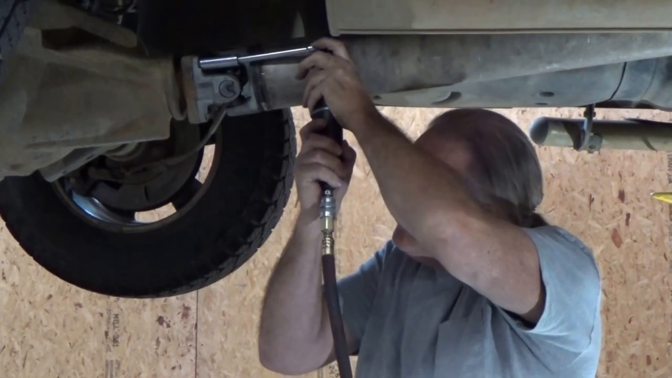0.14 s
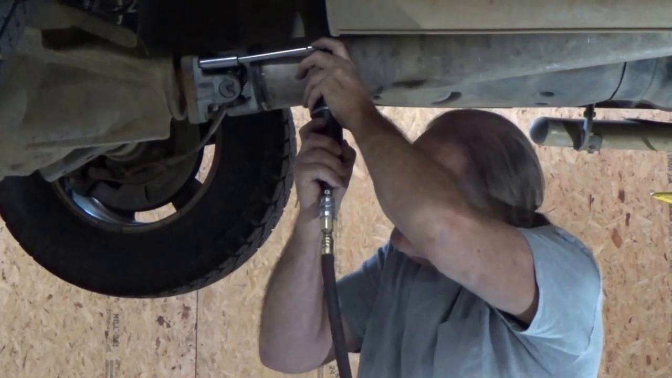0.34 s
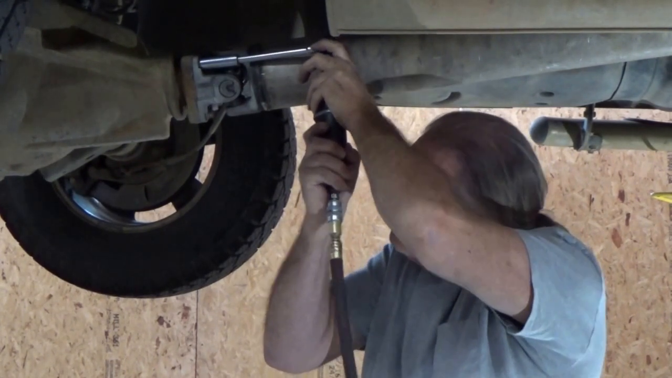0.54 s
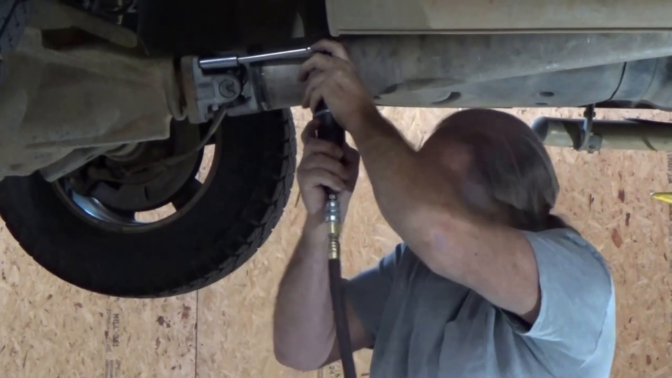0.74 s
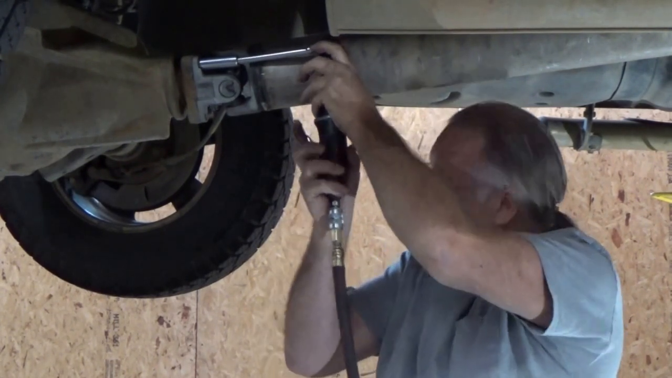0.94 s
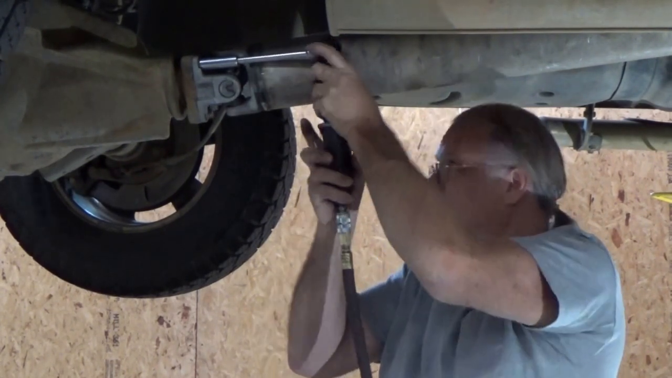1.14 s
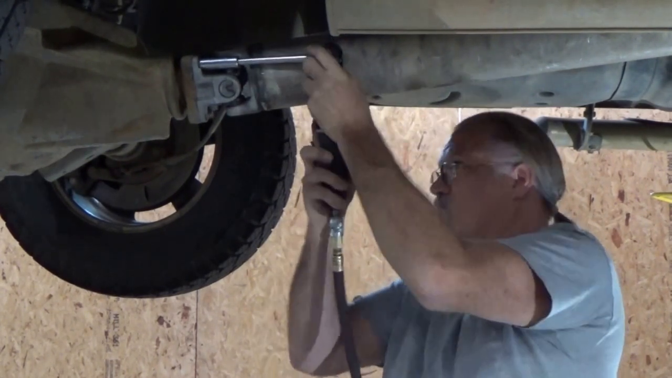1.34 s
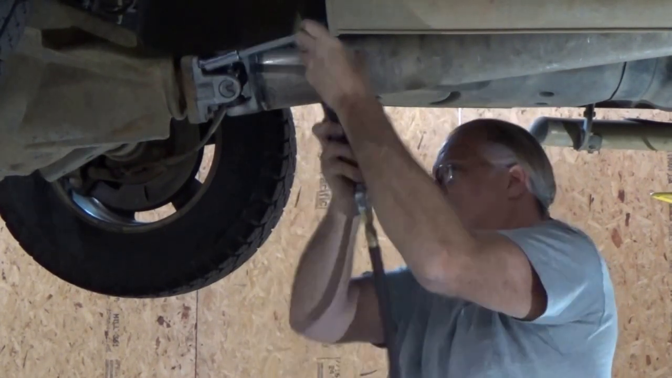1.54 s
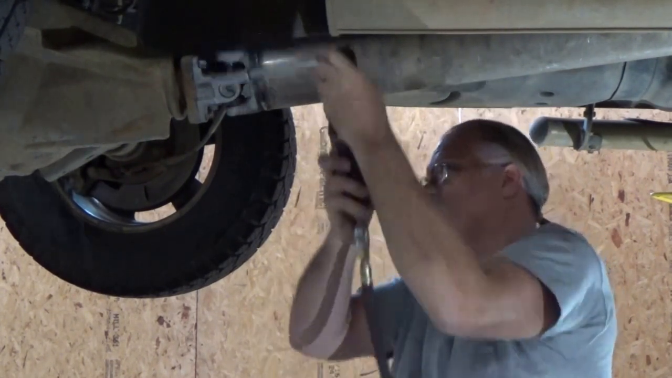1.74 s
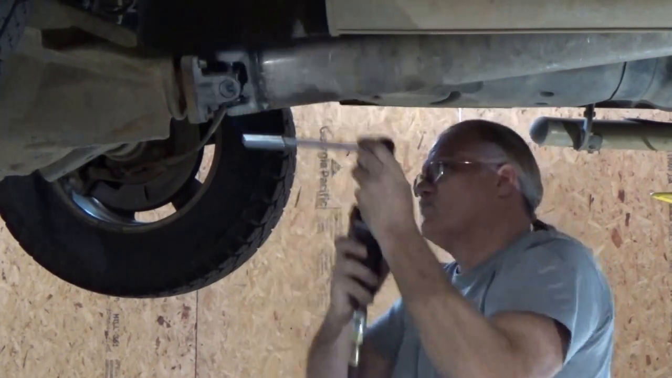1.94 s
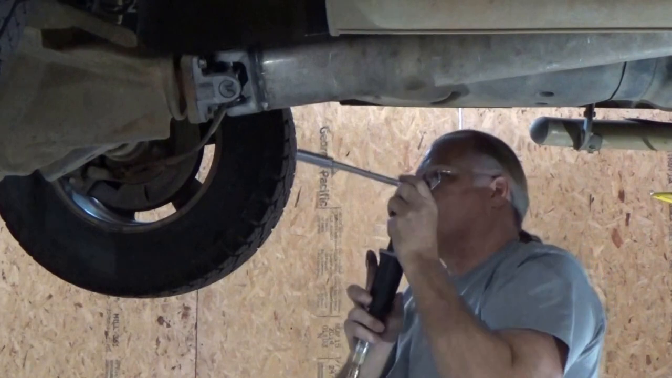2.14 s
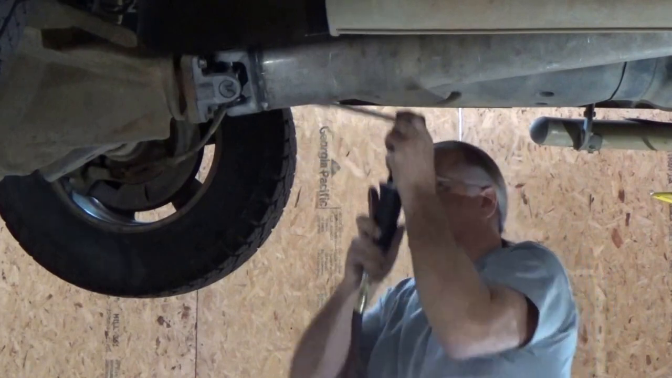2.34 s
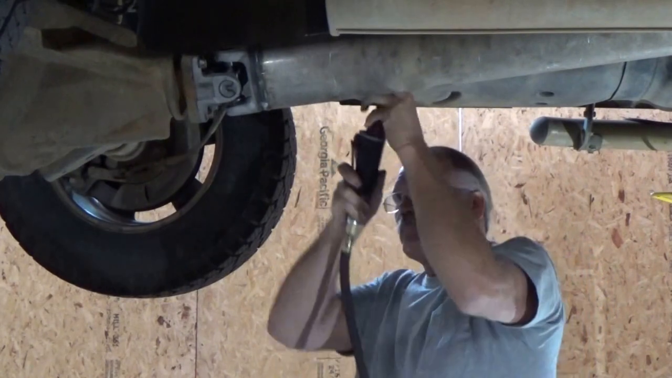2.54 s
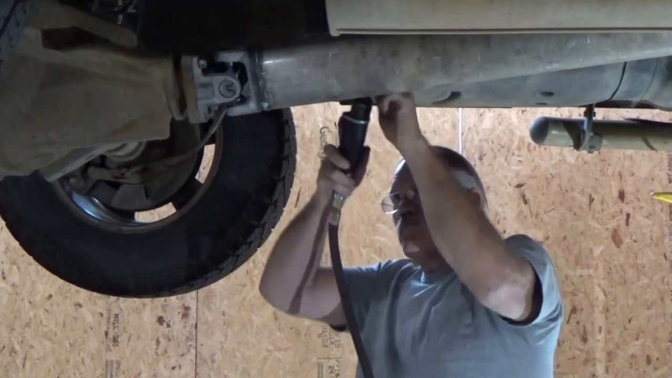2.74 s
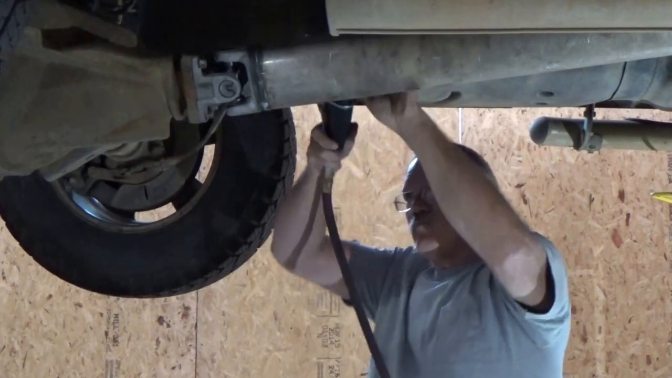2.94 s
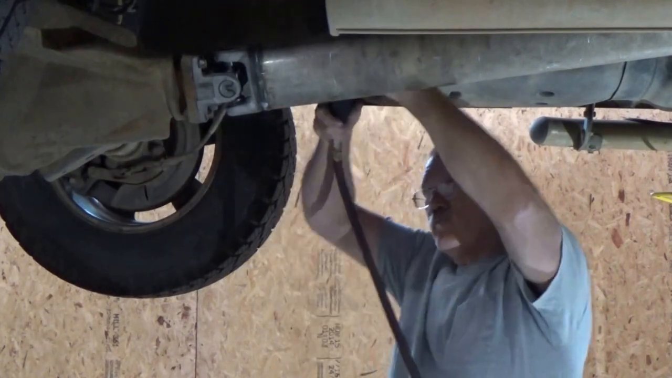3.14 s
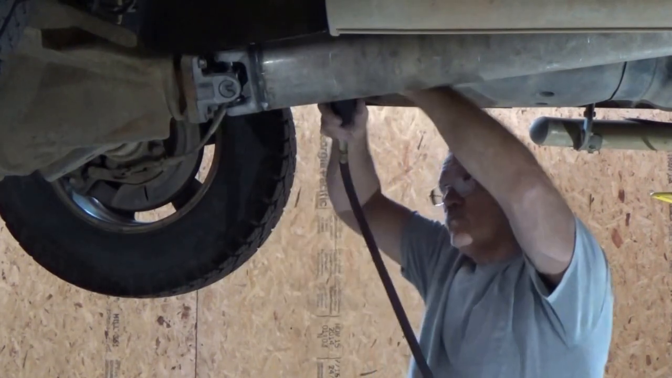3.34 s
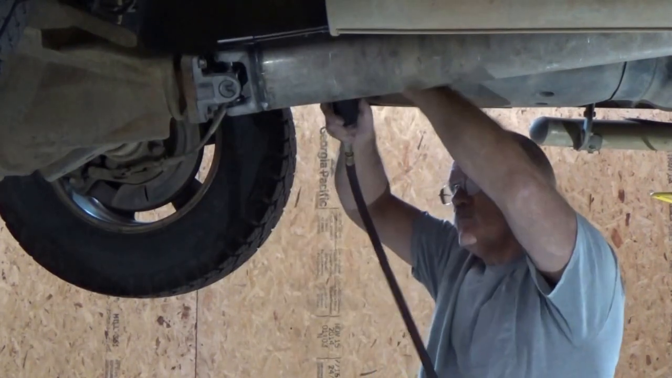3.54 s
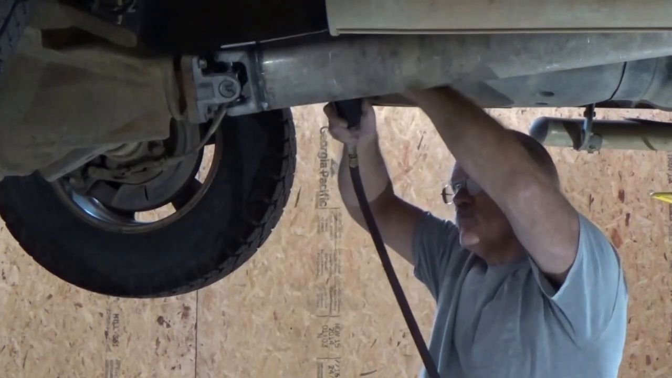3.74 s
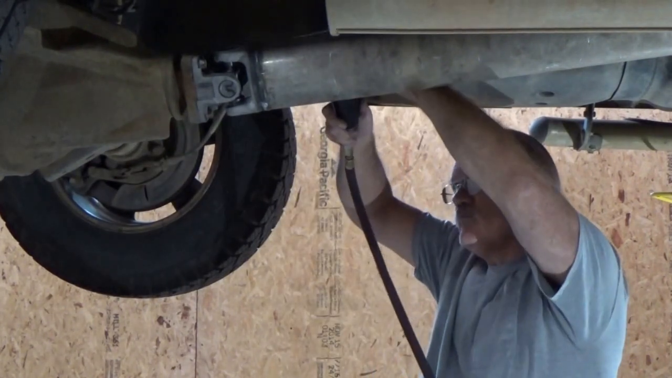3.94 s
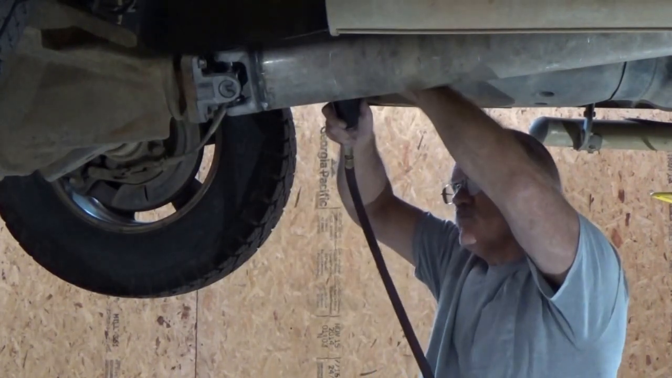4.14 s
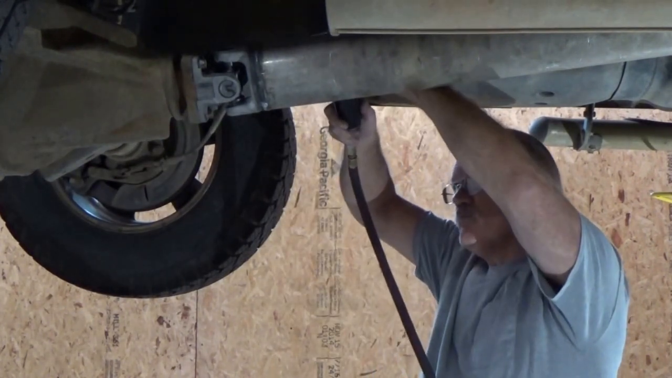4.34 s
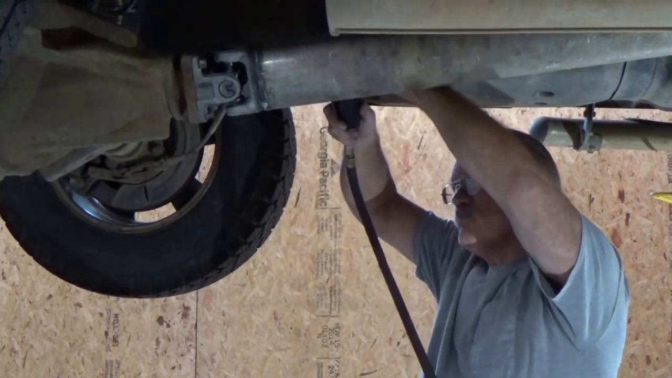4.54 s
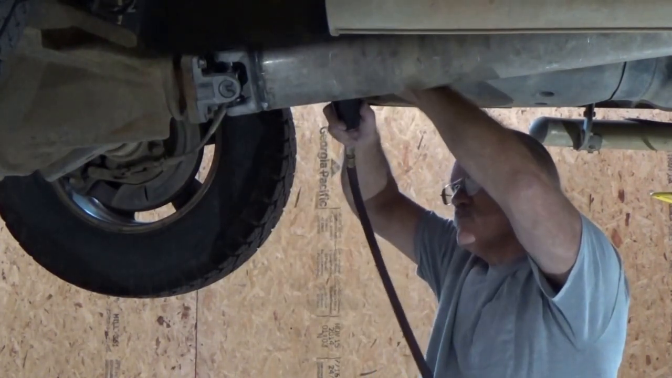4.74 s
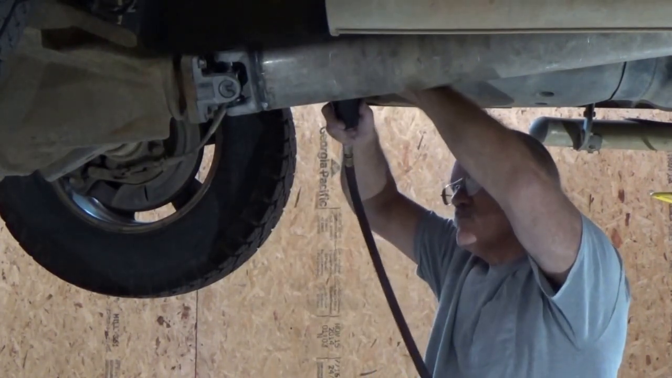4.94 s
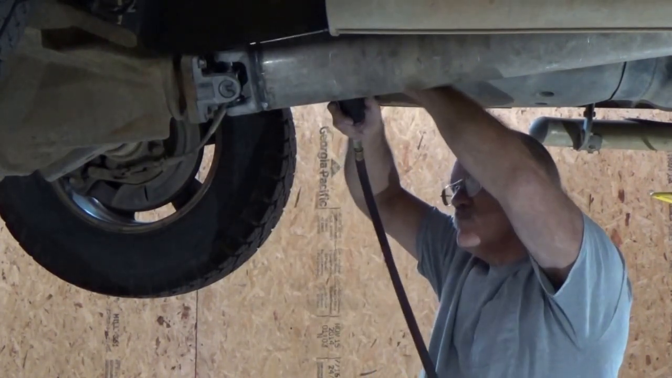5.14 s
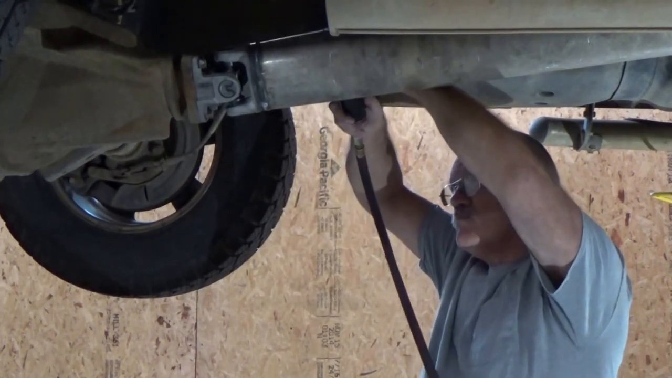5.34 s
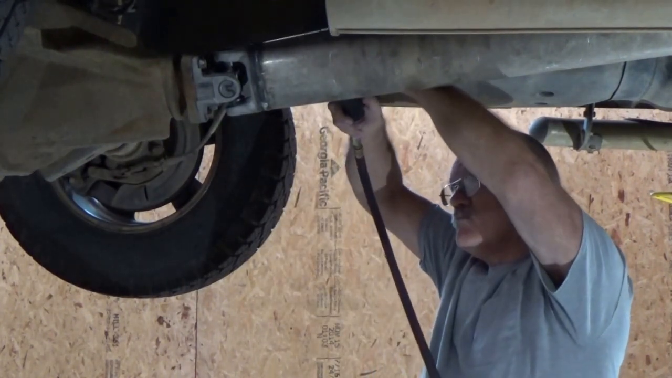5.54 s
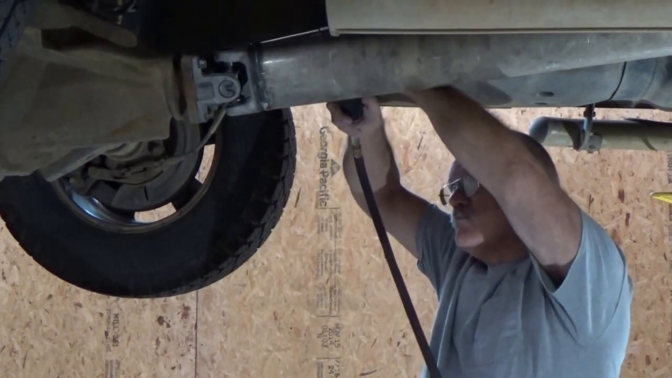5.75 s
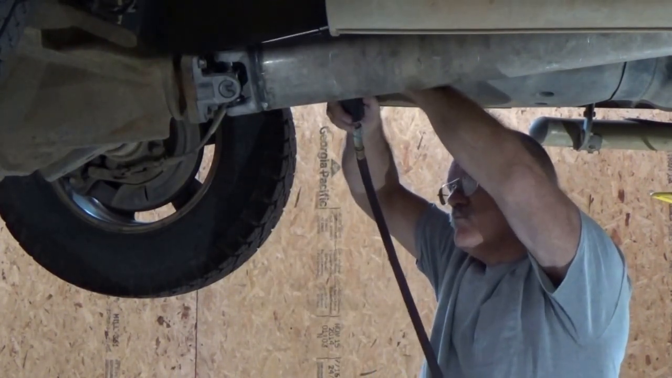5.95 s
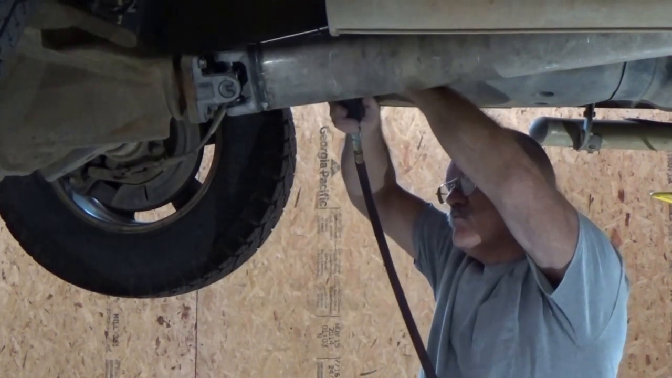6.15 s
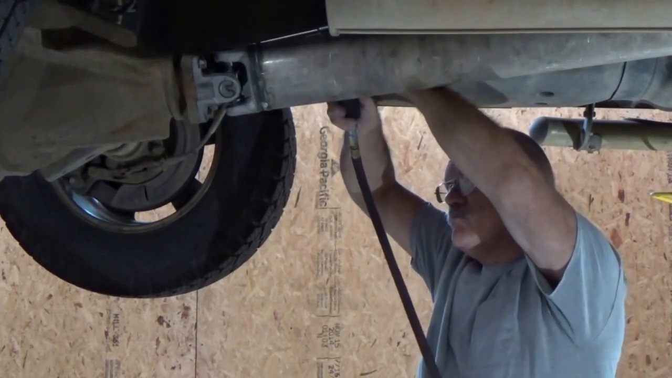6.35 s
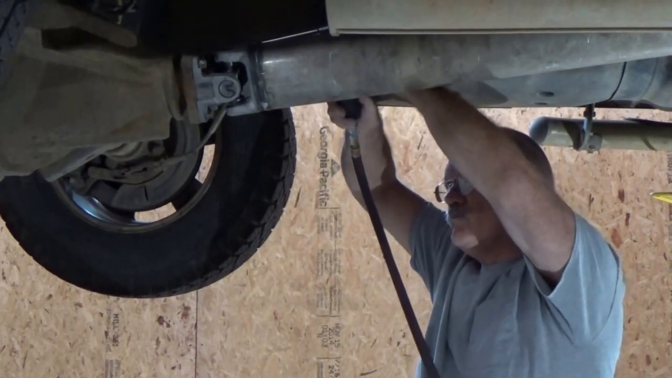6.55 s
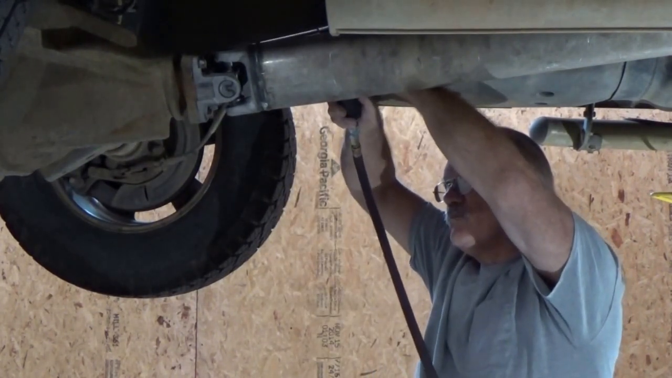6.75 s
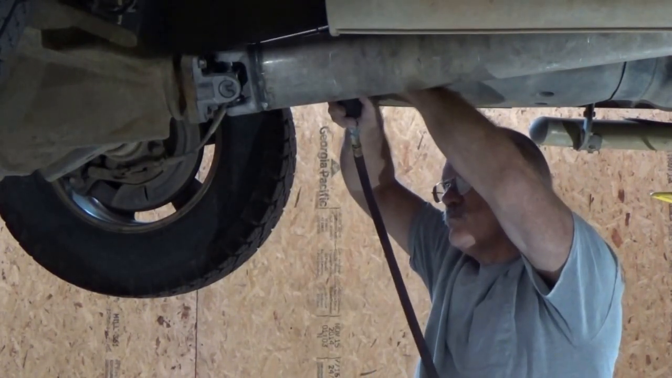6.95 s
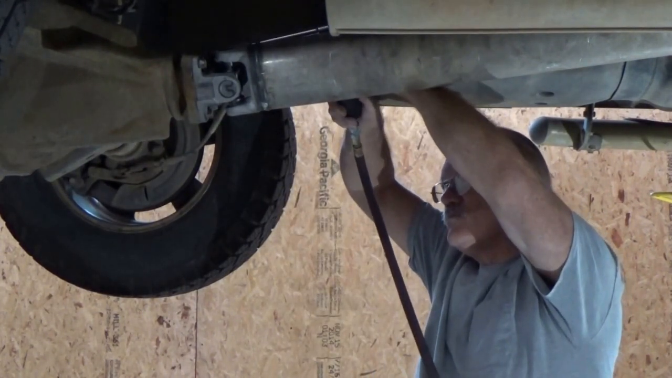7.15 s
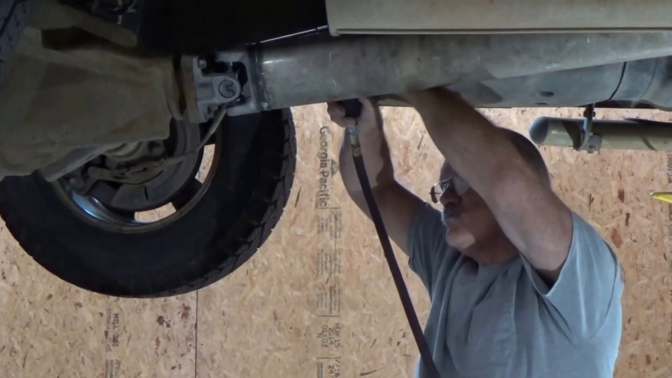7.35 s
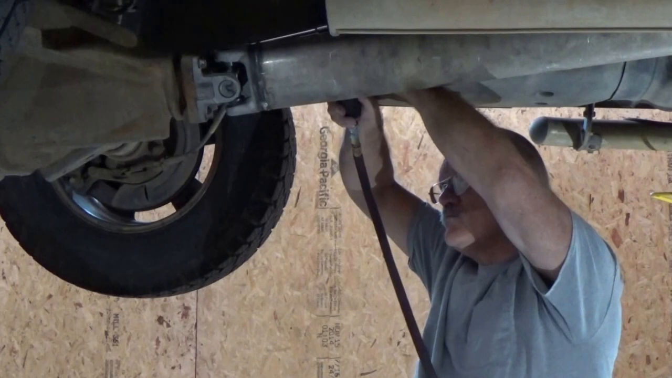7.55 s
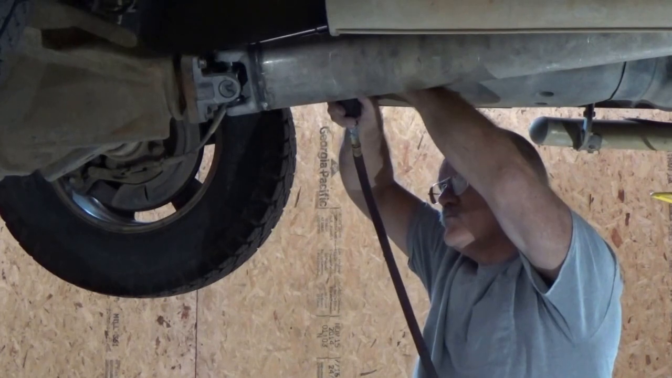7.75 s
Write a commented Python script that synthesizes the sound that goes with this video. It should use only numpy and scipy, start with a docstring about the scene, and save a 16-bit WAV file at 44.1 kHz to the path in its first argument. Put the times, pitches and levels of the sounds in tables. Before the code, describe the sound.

An air ratchet hisses and rattles to a stop, metal knocks under a truck, then the tool runs again with a loud hiss and whine.

```python
"""First the exhaust hiss of an air ratchet, close to a microphone pair under a truck in a wooden workshop.
Gears and pawl rattle as it labours on a bolt and stops. The socket comes off with a clink, and the
tool knocks about the ringing steel underbody while its coupling leaks faintly over a low rumble.
Then it runs at full speed: a loud rush of air from the muffler with the whine of its six-vane motor."""
import sys
import numpy as np
from scipy import signal
from scipy.fft import rfft, irfft, next_fast_len
from scipy.io import wavfile

SR = 44100
rng = np.random.default_rng(int(sys.argv[2]) if len(sys.argv) > 2 else 0)


def to_wav(s):
    """Save 16-bit WAV."""
    ch = np.atleast_2d(s).T  # columns
    pcm = np.round(np.clip(ch, -1, 1) * 32767)  # PCM
    wavfile.write(sys.argv[1], SR, pcm.astype(np.int16))


N = 344421
T = np.arange(N) / SR


# the air jet, heard close up: f/Hz, level/dB
JET_SPECTRUM = [(100, -52.5), (450, -27), (2000, -22), (3500, -13.5), (4500, -17.5), (5750, -10.5),
                (6650, -17), (8100, -5.5), (9300, -1.5), (10700, 0), (12400, -1.5), (14000, -7),
                (16000, -13.5)]
# narrow resonances of the muffler ports: f/Hz, width/Hz, level/dB
MUFFLER_PORTS = [(5820, 60, -1.5), (6700, 38, -7), (8000, 44, -7), (8720, 40, -2.5), (8700, 70, -13),
                 (9080, 80, -3), (9670, 39, -9.5), (10100, 60, -14), (11915, 58, -5), (12500, 110, -4),
                 (13600, 73, -2), (14600, 74, -4)]

def exhaust(flutter_db=.6):
    """Turbulent air leaves through the muffler ports and rings in them."""
    jet = colour(rng.standard_normal(N), JET_SPECTRUM)
    jet = jet + resonances(jet, MUFFLER_PORTS)
    return airflow() * from_db(flutter_db * drift(150)) * rms_one(jet)


# trigger pulls: pressed t/s, released t/s, air level/dB, gear level/dB, whine level/dB
TRIGGER_PULLS = [(-1, .825, -16.3, -39.5, -46), (5.37, 8, -17.6, -33, -29.6)]
VALVE_OPEN_S = .017

def airflow(shut_db_per_s=1200, bleed_db=-21, bleed_db_per_s=130):
    """Gain of the air: the valve opens, holds and shuts, then what is left in the motor bleeds away."""
    flow = 0
    for pressed, released, air_db, _, _ in TRIGGER_PULLS:
        opening = np.minimum(since(pressed) / VALVE_OPEN_S, 1)
        after = since(released)
        closing_db = np.maximum(-shut_db_per_s * after, bleed_db - bleed_db_per_s * after)
        flow = flow + opening * from_db(air_db + closing_db)
    return flow


# rotor whine, the sixth order being the vanes: multiple of the turning rate, level/dB
ROTOR_ORDERS = [(2, -24), (4, -18), (5, -12), (6, 1), (8, -19), (12, -19)]
# gear rattle: f/Hz, level/dB
GEAR_SPECTRUM = [(25, -40), (60, -25), (130, -7), (300, -10.5), (480, 0.5), (900, -0.5), (1400, 4),
                 (2100, -3.5), (3000, -2.5), (5000, 3.5), (8000, 1), (16000, -3)]
# snap of the pawl: f/Hz, level/dB
PAWL_SPECTRUM = [(25, -45), (60, -27), (150, -2), (300, -5.5), (550, -2), (780, 1), (1100, -9), (2000, -9),
                 (3600, -2), (6000, -12.5), (16000, -31)]

def motor(hunting=.001, wander=.0006, judder=2.5, waver_db=1.0, uneven_db=2.5):
    """The rotor whines, and growls under load; gears rattle and the pawl snaps once per stroke."""
    speed_hz, gear_gain, whine_gain, pawl_gain, growl_gain = rotor()
    # the speed hunts slowly, and a stiff bolt makes it judder
    unsteady = 1 + hunting * drift(6) + wander * drift(60) + judder * pawl_gain * drift(250)
    turns = np.cumsum(speed_hz * unsteady) / SR
    angle = 2 * np.pi * turns
    whine = sum(from_db(db + waver_db * drift(35)) * np.sin(k * angle) for k, db in ROTOR_ORDERS)
    growl = from_db(4 * drift(120)) * np.sin(2 * angle)
    # one stroke of the yoke in five turns, each an impact that dies away
    strokes = turns / 5
    force = from_db(uneven_db * rng.standard_normal(N))[strokes.astype(int)]
    gears = colour(rng.standard_normal(N) * np.exp(-1.3 * (strokes % 1)), GEAR_SPECTRUM)
    pawl = colour(rng.standard_normal(N) * force * np.exp(-3 * (strokes % 1)), PAWL_SPECTRUM)
    return whine_gain * whine + growl_gain * growl, gear_gain * gears + pawl_gain * pawl


# the bolt tightens: t/s, share of the speed lost
BOLT_LOAD = [(.3, 0), (.44, .05), (.53, .18), (.57, .31), (.82, .32), (1.0, .32), (1.2, 0)]

def rotor(free_hz=569, lag_s=.016, spin_up_s=.015, coast_s=.11, overshoot=.052, overshoot_s=.24):
    """Trigger and bolt set the speed; speed and load set the gains of gears, whine, pawl and growl."""
    load = in_time(BOLT_LOAD)
    speed_hz = gears = whine = pawl = growl = 0
    for pressed, released, _, gear_db, whine_db in TRIGGER_PULLS:
        spin = 1 - np.exp(-since(pressed + lag_s) / spin_up_s)
        coast = np.maximum(1 - (since(released) / coast_s) ** 2, 0)
        # pressure stored in the hose makes the speed overshoot at first
        pressure = 1 + overshoot * np.exp(-since(pressed) / overshoot_s)
        driven = np.minimum(since(pressed) / VALVE_OPEN_S, 1) ** 2 * coast ** 3
        surge = 4 * spin * (1 - spin)  # the work of speeding up peaks at half speed
        speed_hz = speed_hz + free_hz * spin * coast * pressure * (1 - load)
        gears = gears + driven * from_db(gear_db + 17 * load)
        whine = whine + driven * spin ** 8 * from_db(whine_db - 20 * load)
        pawl = pawl + driven * (from_db(-56 + 53 * load) + (1 - spin) * from_db(-27))
        growl = growl + driven * from_db(-58 + 14 * load) + surge * spin * from_db(-21)
    return speed_hz, gears, whine, pawl, growl


# the pawl snatches as the motor stops: t/s, level/dB, f/Hz
PAWL_SNATCHES = [(.839, -19.5, 780), (.872, -28, 613)]

def snatches(t60=.066):
    """A jolt through the drive rings briefly in the bolted part."""
    out = np.zeros(N)
    for s, db, hz in PAWL_SNATCHES:
        add(out, s, damped_tone(hz, db, t60))
    return out


# tool and socket against the steel: t/s, level/dB, softness 0-1, relative tick level/dB
BLOWS = [(1.4498, -41, .35, -18), (1.5852, -39, .03, -2.5), (1.642, -30, .08, -5), (1.7815, -36, 0, -3),
         (2.3314, -49.5, 0, 1.5), (2.359, -48.5, .05, 3), (2.397, -52, .2, 5), (2.5328, -30, .78, 0),
         (2.57, -42.5, .8, 0), (2.6958, -12.5, .15, -23), (2.8948, -11.2, .21, -8.5),
         (3.043, -33.5, .52, -12), (3.237, -43.5, .58, -16), (3.4505, -43.5, .93, -14),
         (3.5677, -24.5, .34, -12), (3.657, -27, .62, -14), (3.8105, -35, .5, -17), (3.986, -34, .38, -22),
         (4.0798, -24, .38, -11), (4.6505, -39.5, .86, -12), (4.7187, -45.5, .8, -14),
         (4.7338, -33, .33, -19), (4.7595, -35.5, .58, -18), (4.8724, -29.5, .54, -9),
         (5.0649, -31, .45, -5), (5.1367, -50.5, .86, -10)]
# thump, body, clack and tick of a blow: low f/Hz, high f/Hz, level/dB, t60/s
BLOW_BANDS = [(102, 230, -4.5, 0.25), (453, 2170, 6, 0.083), (1300, 5940, 1.5, 0.072),
              (6940, 13500, 8, 0.03)]
# resonances of the truck's underbody: f/Hz, width/Hz, level/dB
UNDERBODY_MODES = [(165, 14, 7), (292, 30, 12), (464, 57, 4), (524, 55, 7), (613.5, 16.4, 12), (720, 30, 7),
                   (1028, 18, 6), (1145, 40, 9), (1720, 60, 1), (2200, 50, -1), (2440, 45, 6),
                   (2960, 150, -12), (3500, 60, -5), (4040, 45, 3), (5300, 300, -3), (5940, 60, -1),
                   (10020, 1860, 7.5)]
BODY_DB, BODY_SOFT_DB = -27, 33  # body of a hard blow, and what full softness adds

def knocks(grain_db=2.5, gain_db=-6.5, hard_rise_s=.00065, soft_rise_s=.0043):
    """Each blow sets off a dense clatter of steel, the lows lasting longest, coloured by the underbody."""
    out = np.zeros(N)
    for s, db, softness, tick_db in BLOWS:
        white, grain = rng.standard_normal((2, SR))
        # soft blows have more thump and body, swell more slowly and last longer
        thump_db, body_db = -49 + 57 * softness, BODY_DB + BODY_SOFT_DB * softness
        cushion = softness ** 3
        clatter = rms_one(white * from_db(grain_db * grain)) * rise(hard_rise_s + soft_rise_s * cushion)
        for (low, high, band_db, t60), own_db in zip(BLOW_BANDS, (thump_db, body_db, 0, tick_db)):
            width_gain = np.sqrt(SR / 2 / (high - low))
            part = band(clatter * fade(t60 * (1 + .9 * cushion)), low, high)
            add(out, s, from_db(db + band_db + own_db) * width_gain * part)
    return from_db(gain_db) * (out + resonances(out, UNDERBODY_MODES))


# the socket touches its extension: t/s, level/dB
SOCKET_TOUCHES = [(1.2508, -24), (1.2575, -9)]
# modes of the socket: f/Hz, level/dB, t60/s
SOCKET_MODES = [(8550, -1, .02), (9450, 2, .018), (11900, -16, .012), (13300, -23, .012)]

def socket():
    """The hand-held socket rings in beating modes that are quickly damped, over a light tick."""
    out = np.zeros(N)
    clink = sum(damped_tone(*mode) for mode in SOCKET_MODES) * rise(.00073)
    tick = from_db(-21.5) * band(rng.standard_normal(SR), 1900, 12500) * fade(.039)
    for s, db in SOCKET_TOUCHES:
        add(out, s, from_db(db) * (clink + tick))
    return out


# steel brushes along steel: t/s, level/dB
BRUSH_TOUCHES = [(2.156, -44), (3.657, -35), (4.875, -43)]
# mode clusters of the steel around the microphones: f/Hz, half width/Hz, relative level/dB, t60/s
FRAME_RING = [(90, 7.2, -27, .85), (143, 6.3, -24.5, 2.0), (245, 25, -33, 1.3), (430, 18, -29, .7)]
FLOOR_PAN_RING = [(230, 90, -10, .28), (560, 70, -7, .24), (755, 23, -5, .2), (1025, 18, -6, .26),
                  (1140, 30, -10, .16), (1900, 400, -7, .13)]
SOCKET_AFTER_RING = [(8600, 200, -30, .13), (9700, 280, -28, .17)]
BRUSHED_RING = [(800, 400, -12, .4), (2430, 170, 0, .36), (3930, 1700, -7, .42)]
EXTENSION_RING = [(200, 70, -2, .3), (390.5, 4, 1, .62)]

def ringing_steel(bar_freed_s=1.644):
    """Frame, floor pan, socket, brushed steel and extension bar ring on after a jolt or touch."""
    out = np.zeros(N)
    for s, db, _ in PAWL_SNATCHES:
        add(out, s, from_db(db) * ring(FRAME_RING, rise_s=.045))
    for s, db, softness, _ in BLOWS:
        if softness > .55:  # only soft blows set the pan going
            body_db = db + BODY_DB + BODY_SOFT_DB * softness
            add(out, s, from_db(body_db) * ring(FLOOR_PAN_RING, rise_s=.006))
    for s, db in SOCKET_TOUCHES:
        add(out, s, from_db(db) * ring(SOCKET_AFTER_RING, rise_s=.001))
    for s, db in BRUSH_TOUCHES:
        add(out, s, from_db(db) * ring(BRUSHED_RING, rise_s=.009))
    add(out, bar_freed_s, from_db(-52) * ring(EXTENSION_RING, rise_s=.0022))
    return out


# thin hiss at the coupling: f/Hz, level/dB
LEAK_SPECTRUM = [(1500, -27), (5000, -13), (7000, -17), (9000, -8), (10800, -3.5), (13000, -8.5),
                 (16000, -12)]
# its rise and fall: t/s, level/dB
LEAK_CURVE = [(1.3, -66), (2.01, -67), (2.52, -64), (2.86, -57), (3.37, -64), (5.1, -56), (5.35, -57)]

def coupling_leak(gain_db=2.6, spurt_s=4.95, spurt_db=-51, spurt_half_s=.06):
    """Air escapes at the coupling and spurts once as the hose is bent."""
    seep = from_db(in_time(LEAK_CURVE) + gain_db)
    spurt = from_db(spurt_db) * np.exp(-((T - spurt_s) / spurt_half_s) ** 2)
    return (seep + spurt) * colour(rng.standard_normal(N), LEAK_SPECTRUM)


# low rumble behind the work: f/Hz, level/dB
RUMBLE_SPECTRUM = [(20, -26), (40, -11.5), (62, 6), (80, 1.5), (110, 3.5), (180, 1), (300, -5.5),
                   (600, -9.5), (1200, -11), (2500, -14), (6000, -26), (16000, -64.5)]
# its rise and fall: t/s, level/dB
RUMBLE_CURVE = [(0.0, -72), (1.07, -62), (1.36, -72), (3.45, -65), (3.82, -58), (4.2, -63), (5.21, -60),
                (5.32, -64), (6.1, -70)]
# the quiet workshop: f/Hz, level/dB
ROOM_TONE_SPECTRUM = [(30, -4), (180, 0), (300, 0), (700, -18), (1500, -13.5), (6700, -28), (10000, -21.5),
                      (16000, -15)]

def room_tone(rumble_gain_db=7.3, quiet_db=-80.5):
    """A low rumble swells and sinks over the steady quiet of the shop."""
    rumble_gain = from_db(in_time(RUMBLE_CURVE) + rumble_gain_db)
    rumble = rumble_gain * colour(rng.standard_normal(N), RUMBLE_SPECTRUM)
    return rumble + from_db(quiet_db) * colour(rng.standard_normal(N), ROOM_TONE_SPECTRUM)


# reverberation of the wooden room: f/Hz, t60/s
WORKSHOP_T60 = [(130, 1.04), (400, 0.76), (1000, 0.45), (3000, 0.74), (6000, 0.73), (10000, 0.31),
                (15000, 0.18)]
# difference between the two microphones: f/Hz, side level/dB
SIDE_SPECTRUM = [(60, -20), (250, -11.5), (1000, 2), (5000, -2), (9000, 1), (13000, -26.5)]

def workshop(x, wet_db, side_db, build_s=.005):
    """Diffuse reflections build up and die band by band, a little different at each microphone."""
    edges = np.geomspace(60, 17000, 13)
    tail = 0
    for low, high in zip(edges, edges[1:]):
        t60 = at_hz(WORKSHOP_T60, np.sqrt(low * high))
        tail = tail + band(rng.standard_normal((2, SR)), low, high) * fade(t60)
    response = rms_one(tail * rise(build_s)) / np.sqrt(SR)
    mid, side = signal.fftconvolve(x[None], response, axes=1)[:, :N] * from_db(wet_db)
    return x + mid + from_db(side_db) * shaped(side, SIDE_SPECTRUM) * [[1], [-1]]


def ring(modes, rise_s):
    """Clusters of close modes hang on after a touch and beat against each other."""
    out = 0
    for hz, half_width, db, t60 in modes:
        cluster = band(rng.standard_normal(SR + SR // 4), hz - half_width, hz + half_width)[-SR:]
        envelope = fade(t60) * rise(rise_s)
        out = out + from_db(db) * np.std(envelope) * rms_one(cluster * envelope)
    return out


def resonances(x, modes):
    """Parallel resonators driven by x, each peaking at its own level."""
    out = 0
    for hz, width_hz, db in modes:
        r = np.exp(-np.pi * width_hz / SR)
        feedforward = np.array([1, 0, -1]) * (1 - r * r) / 2
        feedback = [1, -2 * r * np.cos(2 * np.pi * hz / SR), r * r]
        out = out + from_db(db) * signal.lfilter(feedforward, feedback, x + 1e-18)
    return out


def damped_tone(hz, db, t60):
    """One struck mode dying away."""
    return from_db(db) * np.sin(2 * np.pi * hz * T[:SR]) * fade(t60)


def band(x, low_hz, high_hz):
    """Butterworth band-pass."""
    return signal.sosfilt(signal.butter(2, [low_hz, high_hz], "band", fs=SR, output="sos"), x)


def shaped(x, spectrum):
    """Filter by a table of dB over frequency."""
    size = next_fast_len(N)
    gain = from_db(at_hz(spectrum, np.fft.rfftfreq(size, 1 / SR)))
    return irfft(rfft(x, size) * gain, size)[..., :N]


def colour(x, spectrum):
    """Give a signal a spectrum, at unit power."""
    return rms_one(shaped(x, spectrum))


def drift(rate):
    """Random wander with spread 1, turning about rate times a second."""
    return rms_one(np.interp(T * rate, np.arange(N), rng.standard_normal(N)))


def rise(seconds):
    """Envelope that swells to 1, one second long."""
    return 1 - np.exp(-T[:SR] / seconds)


def fade(t60):
    """Envelope that dies by 60 dB in t60, one second long."""
    return np.exp(-np.log(1000) * T[:SR] / t60)


def since(s):
    """Seconds since s, zero before it."""
    return np.maximum(T - s, 0)


def in_time(points):
    """Read a curve at every sample."""
    return np.interp(T, *np.transpose(points))


def at_hz(points, hz):
    """Read a table along log frequency."""
    f, value = np.transpose(points)
    return np.interp(np.log(np.maximum(hz, 1)), np.log(f), value)


def add(out, s, sound):
    """Mix a sound in at time s."""
    at = round(s * SR)
    out[at:at + len(sound)] += sound[:N - at]


def from_db(db):
    """Decibels to gain."""
    return 10 ** (np.asarray(db) / 20)


def rms_one(x):
    """Scale to unit power."""
    return x / np.sqrt(np.mean(x ** 2) + 1e-20)


def scene():
    """Under the truck: the tool close and centred, the knocks slightly right, the workshop all round."""
    background = workshop(coupling_leak() + room_tone(), wet_db=-15.5, side_db=3.5)
    tones, rattle = motor()
    air = workshop(exhaust(), wet_db=-6.5, side_db=-10)
    # the tool's tones and the socket reach the microphones mostly by the direct path
    direct = workshop(tones + snatches() + socket(), wet_db=-18, side_db=0)
    drive = workshop(rattle, wet_db=-3.5, side_db=-9)
    contacts = workshop(knocks() + ringing_steel(), wet_db=-10.5, side_db=-6)
    return air + direct + drive + contacts * from_db([[-.5], [.5]]) + background


def record(dry, cutoff_hz=15700):
    """A steep low-pass cuts the top of both microphone channels."""
    return signal.sosfilt(signal.ellip(12, .1, 80, cutoff_hz, fs=SR, output="sos"), dry)


dry = scene()
out = record(dry)
to_wav(out)
```